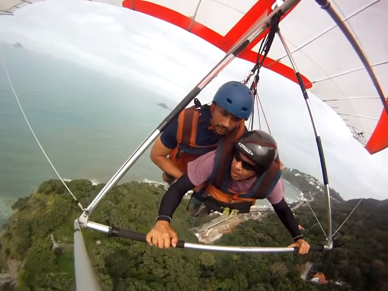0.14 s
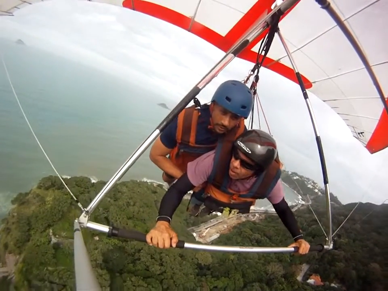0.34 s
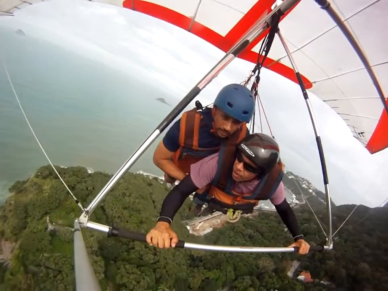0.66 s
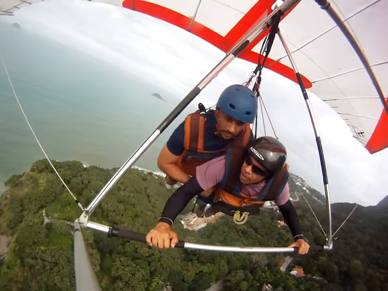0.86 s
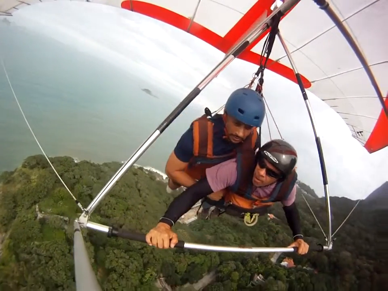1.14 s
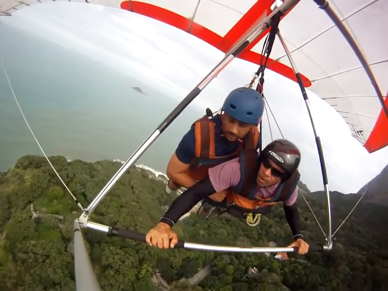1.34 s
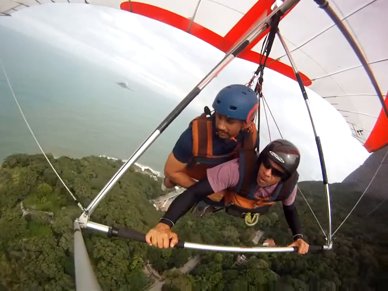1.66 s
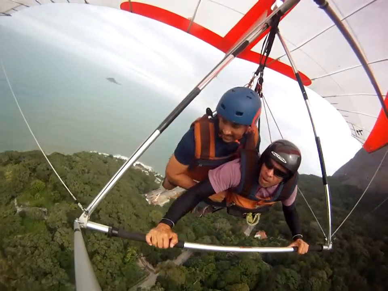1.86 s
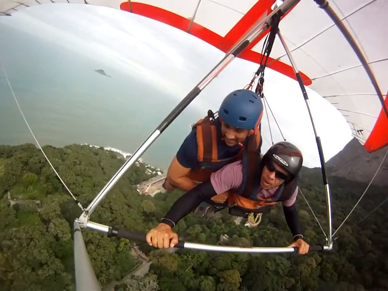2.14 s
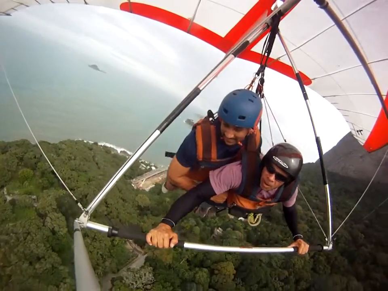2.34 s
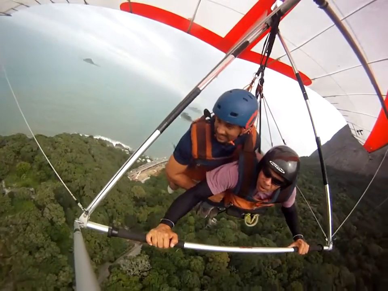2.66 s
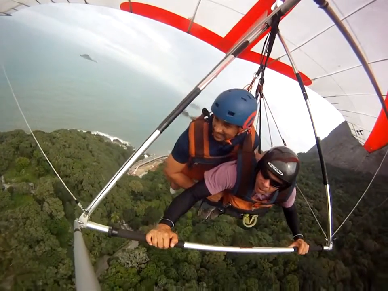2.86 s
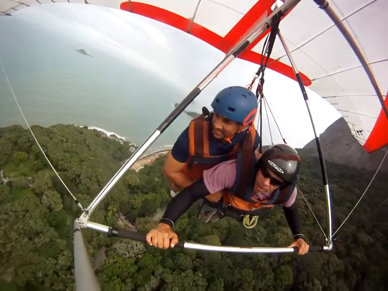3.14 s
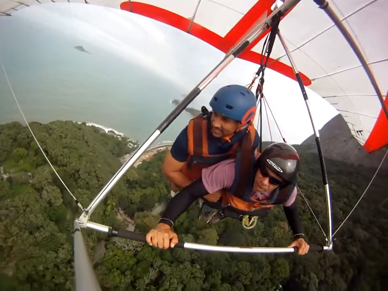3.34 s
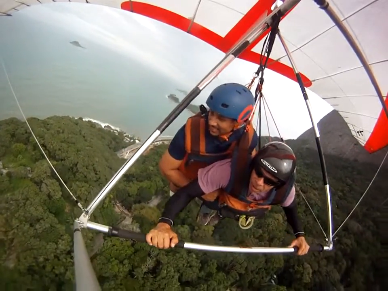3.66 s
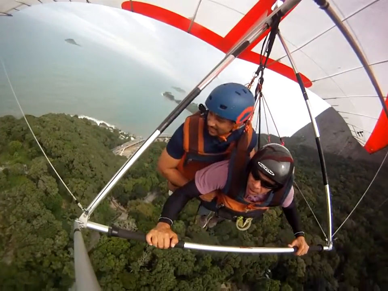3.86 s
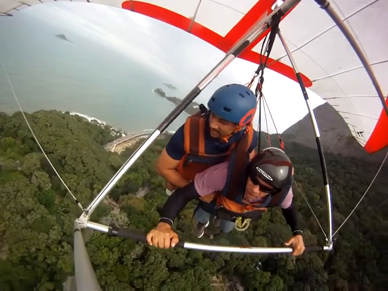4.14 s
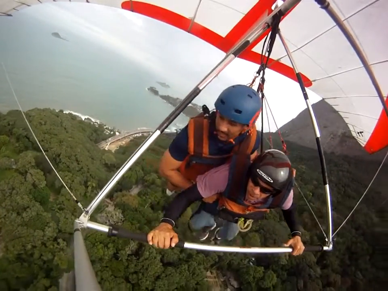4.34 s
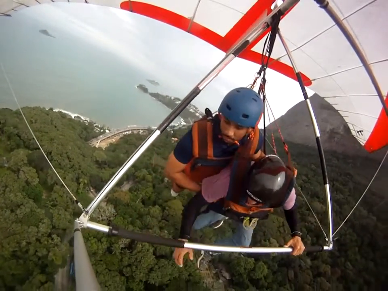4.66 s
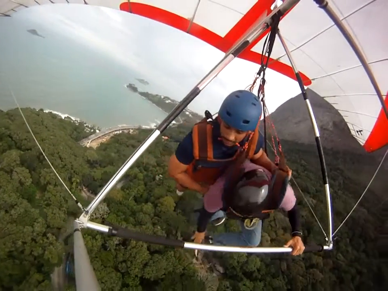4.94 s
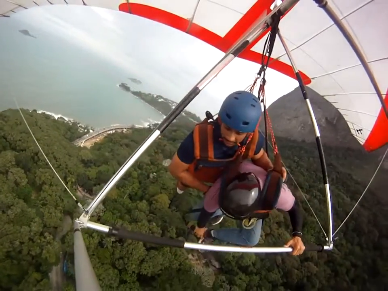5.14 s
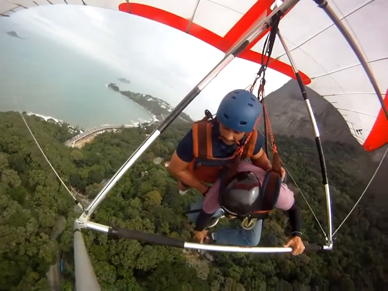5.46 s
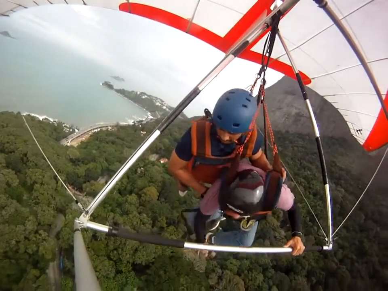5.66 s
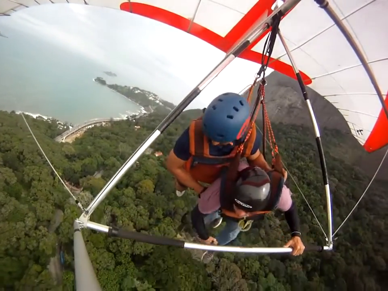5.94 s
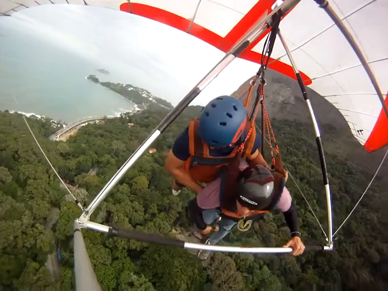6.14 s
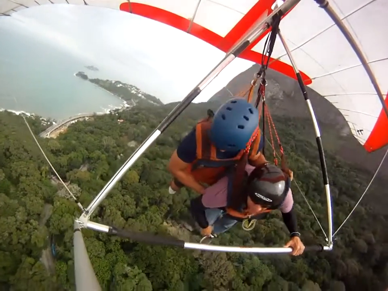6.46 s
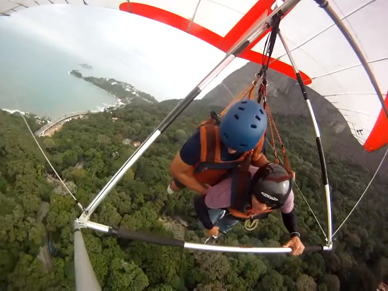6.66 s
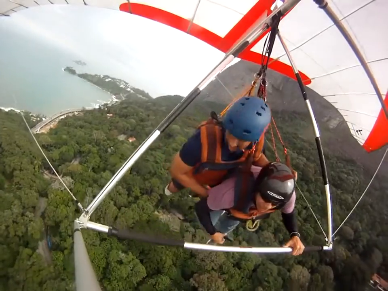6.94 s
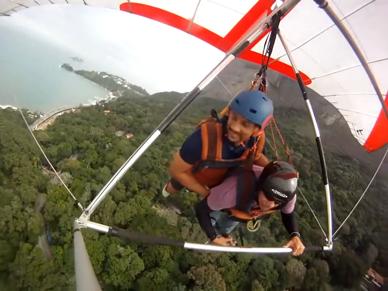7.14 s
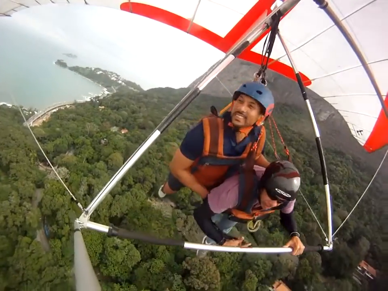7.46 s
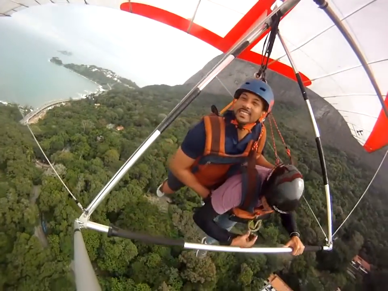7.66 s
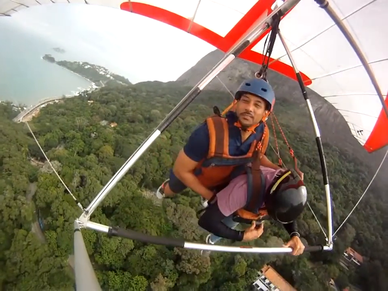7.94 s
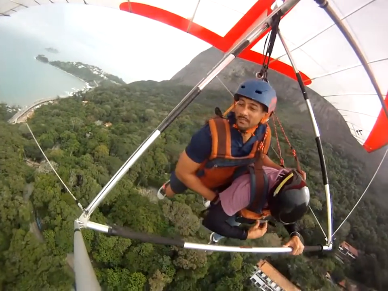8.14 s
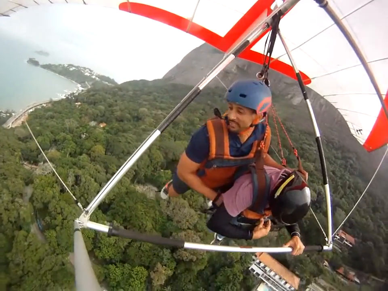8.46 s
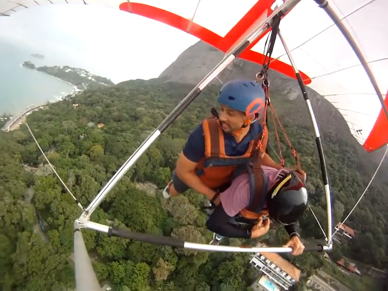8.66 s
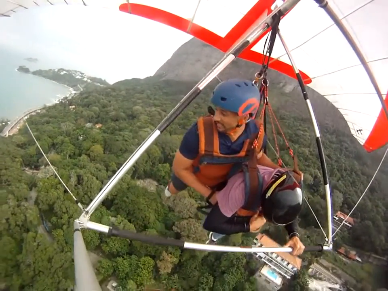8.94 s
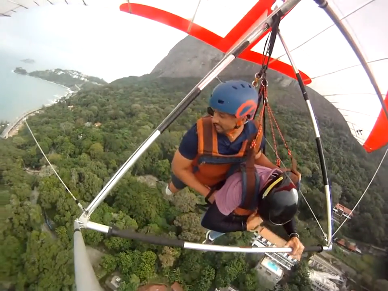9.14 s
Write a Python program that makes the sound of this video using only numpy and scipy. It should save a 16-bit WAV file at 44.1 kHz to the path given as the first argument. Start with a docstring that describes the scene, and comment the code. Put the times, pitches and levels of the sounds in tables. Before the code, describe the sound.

High in open air, a small camera microphone fixed to a hang glider's frame is battered by continuous wind: deep rumble, fluttering roar and a thinner rush. The metal tubes hum low and waver with airspeed, dropping out briefly in rough air. Small fittings tick against the frame, and a few sharp eddy thumps hit the microphone, near the start of the third second, just after three seconds and close to the end. The sound is slightly fizzy and compressed.

```python
"""On the frame of a hang glider in flight, air streams past a small camera.
Eddies rumble and buffet the microphone over a broad rush; single eddies thump on it.
The tubes shed vortices and hum, rising and falling with the airspeed.
A wire whistles faintly, and fittings tick against the frame and make it ring.
The recorder limits peaks and holds coarse samples, which adds a fizz."""
import sys
import numpy as np
from scipy import signal
from scipy.fft import rfft, irfft
from scipy.io import wavfile
from scipy.ndimage import uniform_filter1d

SR = 44100
rng = np.random.default_rng(int(sys.argv[2]) if len(sys.argv) > 2 else 0)


def inscribe(sig):
    """Save sig as 16-bit PCM at rate SR to the path in sys.argv[1].

    A 1-D sig is mono; a 2-D sig holds one channel per row.
    Samples are clipped to [-1, 1] before scaling.
    """
    pcm = np.round(np.clip(np.atleast_2d(sig).T, -1, 1) * 32767)
    wavfile.write(sys.argv[1], SR, pcm.astype(np.int16))


N = 410130
TIME = np.arange(N) / SR  # s
CRUISE_HZ = 360  # pitch of the thick tubes' hum at cruising speed

# spells of smooth flow, in which the tubes hum: start t/s, end t/s, hum level/dB
SMOOTH_SPELLS = [(0.225, 0.862, -17.5), (1.32, 1.84, -18), (2.077, 3.71, -17.5), (4.82, 8.703, -17.5),
                 (9.11, 9.398, -19)]


def gain_of(db):
    """Turns decibels into a factor for the amplitude."""
    return 10 ** (np.asarray(db) / 20)


def evened(x):
    """Scales a signal to an rms (average strength) of 1."""
    return x / np.sqrt(np.mean(abs(x) ** 2) + 1e-20)


def curve(rows):
    """Joins the points of a two-column table by straight lines in time."""
    t, values = np.transpose(rows)
    return np.interp(TIME, t, values)


def add(mix, start_s, sound):
    """Mixes a short sound in at its start time."""
    part = mix[max(round(start_s * SR), 0):][:len(sound)]
    part += sound[:len(part)]


def noise(points):
    """Noise of rms 1 with the given spectrum, and nothing above its last point."""
    hz, db = np.transpose(points)
    bins = np.fft.rfftfreq(N, 1 / SR)
    shape_db = np.interp(np.log(bins + 1), np.log(hz), db)
    colour = gain_of(shape_db) * (bins < hz[-1])
    return evened(irfft(rfft(rng.standard_normal(N)) * colour, N))


def wander(rate_hz):
    """A random curve of rms 1 whose movements fade out above about rate_hz."""
    bins = np.fft.rfftfreq(N, 1 / SR)
    slowing = 1 + (bins / rate_hz) ** 2
    return evened(irfft(rfft(rng.standard_normal(N)) / slowing, N))


def flow():
    """Airspeed as a share of cruising speed, and gust strength in dB over the usual."""
    # pitch of the tubes' vortex tone, which is proportional to the airspeed: t/s, f/Hz
    hum_pitch = [(0.0, 343), (0.4, 337.3), (0.48, 350.2), (1.67, 332.7), (2.17, 346.8), (2.63, 401.3),
                 (2.86, 367.6), (3.06, 379.4), (4.15, 314), (4.77, 314.1), (5.4, 376.9), (5.94, 349),
                 (6.97, 382.3), (7.37, 362.6), (7.88, 364.2), (7.98, 341), (8.57, 385.8), (9.3, 392.7)]
    # strength of the gusts on the microphone: t/s, level/dB
    gust_strength = [(0.0, -33), (0.55, -35.5), (1.12, -29), (1.62, -35.5), (2.21, -32.5), (2.36, -29.5),
                     (3.09, -29.5), (3.28, -34.5), (3.5, -30.5), (3.56, -33.5), (4.8, -33), (4.87, -30),
                     (5.29, -32), (6.38, -30.1), (7.1, -30), (7.95, -31.5), (8.92, -28.8), (9.3, -28.4)]
    usual_gust_db = -32
    return curve(hum_pitch) / CRUISE_HZ, curve(gust_strength) - usual_gust_db


def spell(start_s, end_s):
    """Rises to 1 as the flow settles, holds, and falls as it breaks up."""
    settle_s = 0.11  # time the hum takes to lock in or break up
    return np.clip(np.minimum(TIME - start_s, end_s - TIME) / settle_s + 0.5, 0, 1)


def rough_air():
    """1 between the spells of smooth flow, 0 within them, with sloping changes."""
    return 1 - np.max([spell(start, end) for start, end, _ in SMOOTH_SPELLS], axis=0)


def wind():
    """Large eddies beat on the microphone, most in slow, rough air; small ones roar and hiss with gusts."""
    # spectra of the four layers, from the deepest up: f/Hz, relative level per Hz/dB
    rumble_spectrum = [(10, -21), (25, -6), (45, -2), (65, 2), (105, -.5), (150, -7.5), (260, -21),
                       (600, -59.5)]
    buffet_spectrum = [(60, -20), (110, -5), (160, 0.5), (260, -3), (340, 0), (430, -9), (600, -14.5),
                       (1200, -53)]
    roar_spectrum = [(250, -17), (400, -1.5), (520, -1), (620, -6), (800, -11), (1000, -15.5), (1300, -20),
                     (1800, -31), (3000, -51)]
    rush_spectrum = [(600, -13.5), (1200, 4), (1750, 5.5), (2050, 6), (2400, 5), (2650, 3), (2930, 5.5),
                     (3400, -4), (3850, -2), (4250, -8), (4600, -8.5), (5100, -10.5), (5500, -13.5),
                     (6000, -7)]
    speed, gust_db = flow()
    # extra dB in rough air, and 9 dB more each time the airspeed halves
    eddies_db = 2 * rough_air() - 9 * np.log2(speed)
    flutter = wander(rate_hz=18)  # shared by the roar and the rush

    # each level starts from its value in smooth air at cruising speed and in the usual gusts;
    # the factor of gust_db is the gain in dB for each dB of gust
    rumble_db = -25.5 + 0.55 * gust_db + 0.35 * eddies_db + 1.2 * wander(rate_hz=13)
    buffet_db = -19.5 + eddies_db + 0.91 * wander(rate_hz=38)
    roar_db = -25.5 + 1.17 * gust_db + 1.45 * flutter
    rush_db = -40 + 0.87 * gust_db + 1.05 * flutter + 0.9 * wander(rate_hz=350)

    rumble = noise(rumble_spectrum) * gain_of(rumble_db)
    buffet = noise(buffet_spectrum) * gain_of(buffet_db)
    roar = noise(roar_spectrum) * gain_of(roar_db)
    rush = noise(rush_spectrum) * gain_of(rush_db)
    return rumble + buffet + roar + rush


def thumps(length_s):
    """A single eddy hits the microphone port: one short dip and rebound of pressure."""
    # the single eddies: t/s, peak level/dB
    eddy_hits = [(2.633, 0.5), (3.229, -1.5), (9.088, -5), (9.160, -2)]
    out = np.zeros(N)
    u = np.arange(SR // 50) / SR / length_s - 2  # time in lengths, 0 at the middle
    push = u * np.exp(-u ** 2)
    for start_s, db in eddy_hits:
        add(out, start_s, gain_of(db) * push / abs(push).max())
    return out


def shedding(hz, width_hz, lock):
    """A vortex tone: a narrow band of chance around hz; lock 0-1 steadies its strength."""
    swing = wander(width_hz) + 1j * wander(width_hz)
    swing = swing / (abs(swing) + 1e-3) ** np.clip(lock, 0, 1)
    turning = np.exp(2j * np.pi * np.cumsum(hz * np.ones(N)) / SR)
    return evened((swing * turning).real)


def tubes():
    """Vortices shed by the tubes hum in smooth flow and drone raggedly in rough; a thin tube sounds higher."""
    # moments when the thinner tube locks in and sings out: start t/s, end t/s, extra level/dB
    thin_tube_swells = [(2.38, 2.536, 6), (6.293, 6.5, 8), (7.08, 7.259, 4)]
    speed, gust_db = flow()
    hz = CRUISE_HZ * speed * (1 + 0.00806 * wander(rate_hz=5.93))  # the pitch wavers a little
    strength = sum(gain_of(db) * spell(start, end) for start, end, db in SMOOTH_SPELLS)
    thick = shedding(hz, width_hz=13.3, lock=0.37) * strength
    ragged = shedding(hz * 0.9, width_hz=65, lock=0.11) * gain_of(-24.5) * rough_air()

    # a thinner tube sheds its vortices faster in the same air, and follows the gusts
    swell_db = sum(db * spell(start, end) for start, end, db in thin_tube_swells)
    thin_db = -29.0 + 0.75 * gust_db + swell_db + 1.9 * wander(rate_hz=16)
    thin = shedding(hz * 1.43, width_hz=25.4, lock=0.071) * gain_of(thin_db)
    return thick + ragged + thin


def ticks(level_db, scatter, contact_s):
    """Each blow rings the modes of the frame, some more brightly; the soft contact dulls its start."""
    # fittings tick against the frame: t/s, level before level_db is added/dB, brightness/(dB per octave)
    blows = [(0.0387, -18.5, -5), (0.3931, -16, -1.5), (1.8676, -18.5, 3), (2.111, -21.5, -1.5),
             (2.3896, -14.5, -8), (4.2264, -17, 2), (4.9313, -13, -5.5), (5.0883, -17, -5),
             (5.171, -22, -5)]
    # what the frame rings with: f/Hz, level/dB, time to die down by 60 dB/s
    frame_modes = [(920, -5, .04), (1150, -2, .03), (1490, -3, .03), (1585, -2, .028), (2075, -13, .14),
                   (2300, -6, .03), (3680, -11, .028), (3830, -16, .025), (4400, -23, .02)]
    pivot_hz = 1500  # brightness tilts the modes around this pitch
    out = np.zeros(N)
    t = np.arange(SR // 5) / SR
    hz, mode_db, t60 = np.transpose(frame_modes)[:, :, None]
    detunes = rng.standard_normal((len(blows), len(frame_modes), 1))
    for (start_s, db, brightness), detune in zip(blows, detunes):
        struck = gain_of(mode_db + brightness * np.log2(hz / pivot_hz))
        fading = np.exp(-np.log(1000) * t / t60)
        modes = struck * fading * np.sin(2 * np.pi * hz * (1 + scatter * detune) * t)
        ring = modes.sum(0) * (1 - np.exp(-t / contact_s))
        add(out, start_s, gain_of(db + level_db) * ring / abs(ring).max())
    return out


def wire():
    """A rigging wire sheds vortices and sings faintly on one note, coming and going with the gusts."""
    _, gust_db = flow()
    wire_db = -55.0 + 0.9 * gust_db + 2.5 * wander(rate_hz=1.5)
    return shedding(2509, width_hz=5.9, lock=0.3) * gain_of(wire_db)


def scene():
    """Everything reaches one microphone."""
    air = wind() + thumps(length_s=0.00084)
    frame = tubes() + ticks(level_db=1.0, scatter=0.0082, contact_s=0.00022)
    return (air + frame + wire())[None]


def limiter(x, ceiling_db, recovery_db_per_s):
    """Peaks over the ceiling push the gain down almost at once; it then climbs back steadily."""
    fall = TIME * recovery_db_per_s
    peak_db = np.maximum.accumulate(20 * np.log10(abs(x) + 1e-6) + fall) - fall
    cut_db = uniform_filter1d(np.maximum(peak_db - ceiling_db, 0), size=60)  # smoothed over 60 samples
    return x / gain_of(cut_db)


def record(dry):
    """Limiter, input filter, a stair-step of held samples that mirrors the sound, then the band limit."""
    hold_hz, edge_hz = 12000, 15280  # rate of the held samples; top of the band
    limited = limiter(dry[0], ceiling_db=-3.5, recovery_db_per_s=65)
    dulled = signal.oaconvolve(limited, signal.firwin(71, 5550, fs=SR), "same")
    coarse = signal.resample_poly(dulled, hold_hz, SR)
    # holding each sample mirrors the sound around the hold rate: the fizz
    stairs = signal.resample_poly(np.repeat(coarse, 4), SR, 4 * hold_hz)[:N]
    band_limit = signal.firwin(1023, edge_hz, window=("kaiser", 9), fs=SR)
    return signal.oaconvolve(stairs, band_limit, "same")[None]


dry = scene()
out = record(dry)
inscribe(out)
```